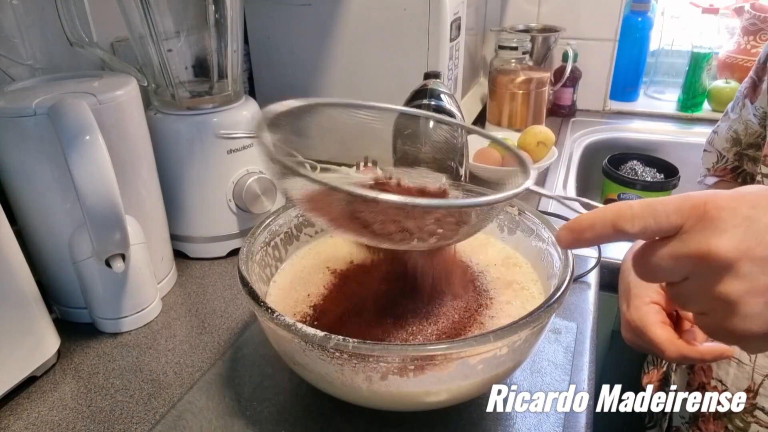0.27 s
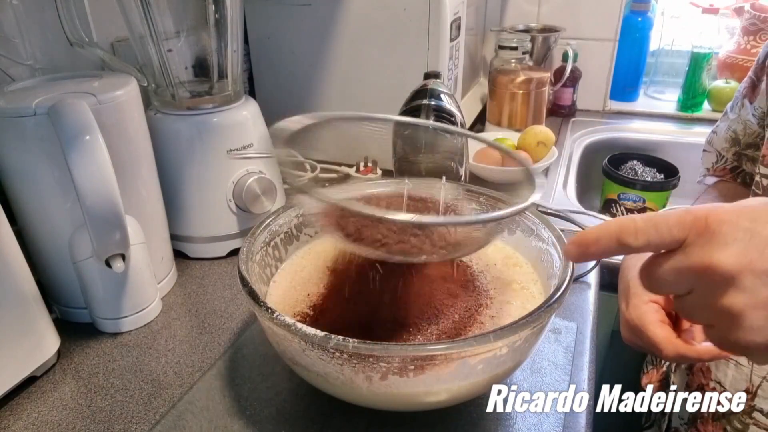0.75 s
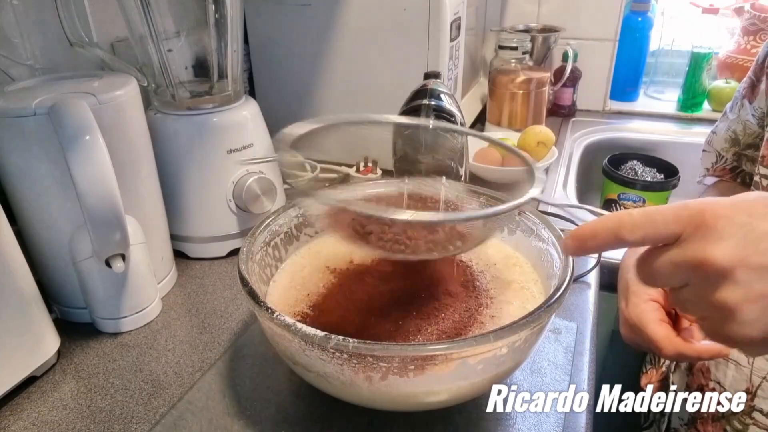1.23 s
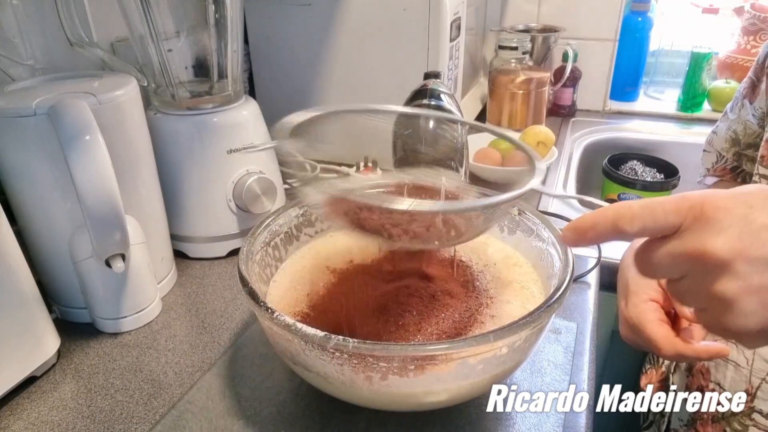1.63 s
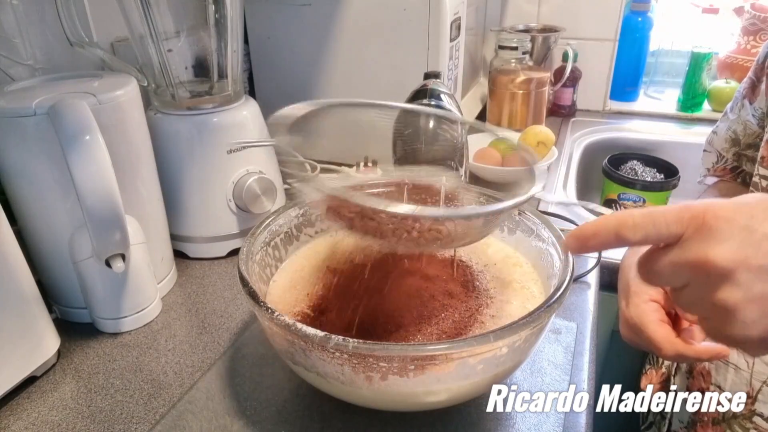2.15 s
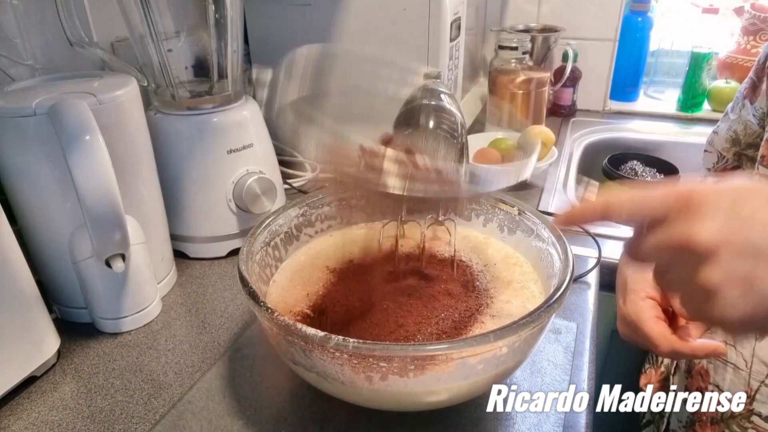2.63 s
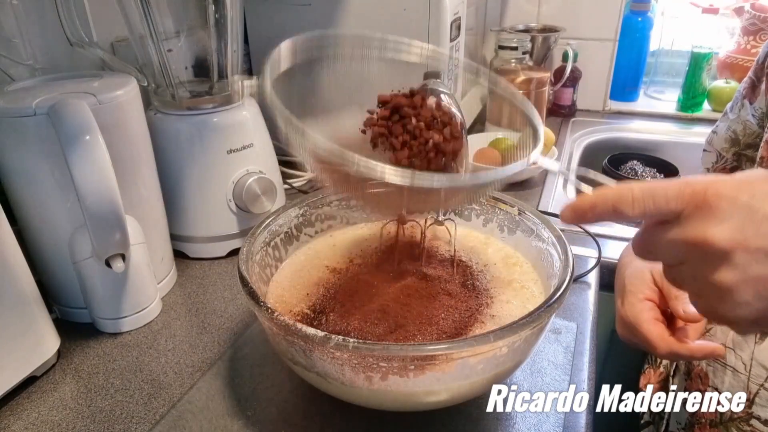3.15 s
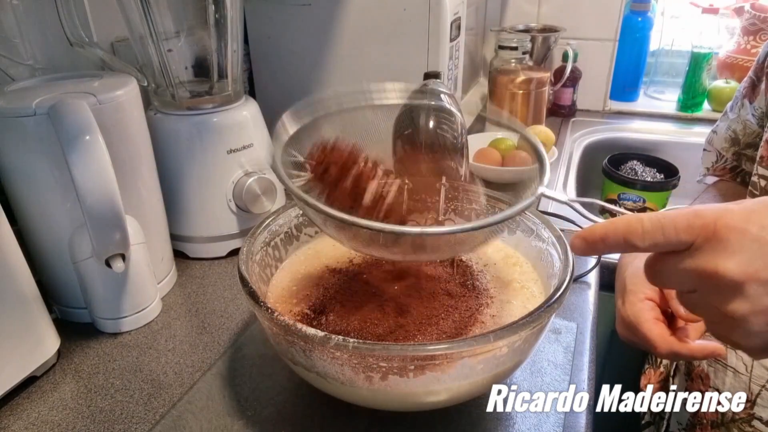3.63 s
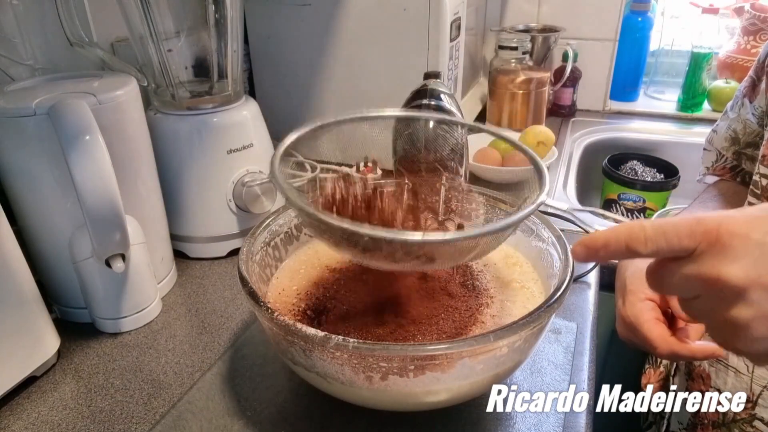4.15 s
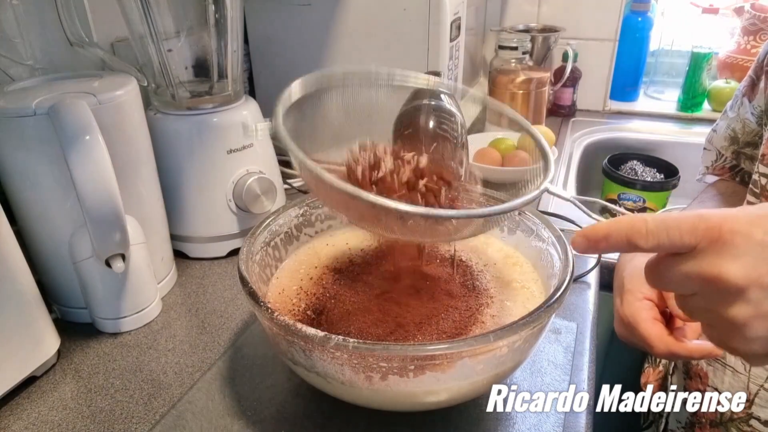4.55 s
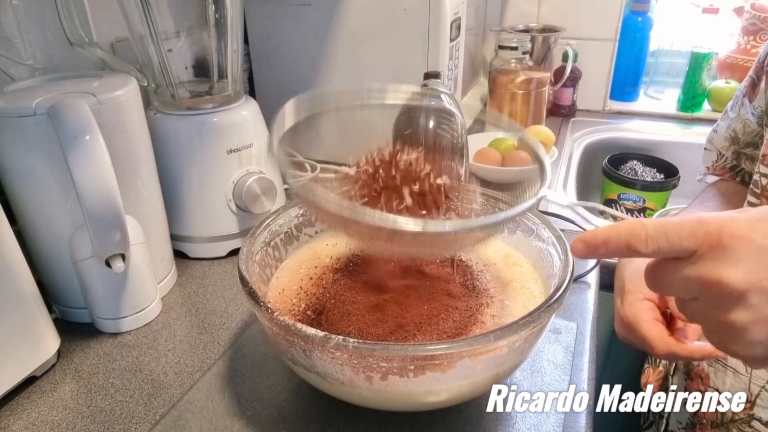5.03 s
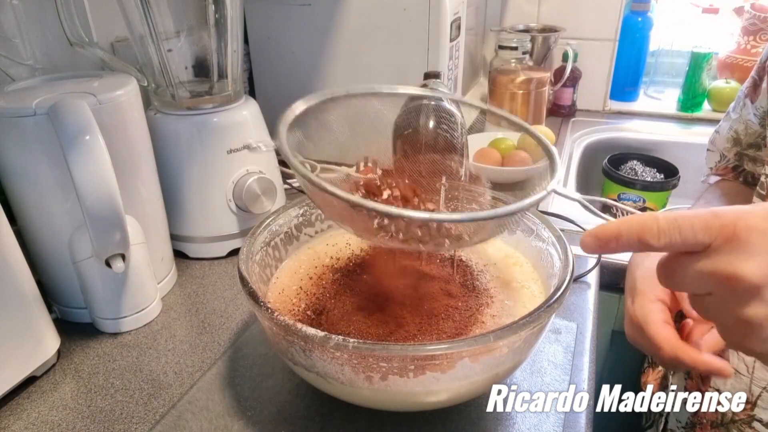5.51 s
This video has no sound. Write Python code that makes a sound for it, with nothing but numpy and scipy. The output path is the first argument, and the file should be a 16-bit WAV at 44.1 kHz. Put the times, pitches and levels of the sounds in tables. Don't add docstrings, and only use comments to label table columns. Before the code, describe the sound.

Close in a quiet, hard-walled kitchen, a wire sieve swishes rapidly back and forth while a finger knocks its rim about five times a second, each knock a small metallic ring with a spray of grains. After about two and a half seconds the shaking stops and lumps are tossed, pattering irregularly on the mesh with bright ticks. A low fridge hum runs throughout.

```python
import sys
import numpy as np
from scipy import signal
from scipy.fft import rfft, irfft, next_fast_len
from scipy.io import wavfile
from scipy.ndimage import uniform_filter1d, map_coordinates

SR = 44100
rng = np.random.default_rng(int(sys.argv[2]) if len(sys.argv) > 2 else 0)


def generate_wav(signal):
    frames = np.transpose(np.atleast_2d(signal))
    scaled = np.clip(frames, -1, 1) * 32767
    pcm = np.round(scaled).astype(np.int16)
    wavfile.write(sys.argv[1], SR, pcm)


def amplitude_ratio(level_db):
    exponent = np.asarray(level_db, float) / 20
    return 10 ** exponent


N = 254589

# centre_hz, width_hz, boost_db
MESH_MODES = [(2150, 54, 2), (2350, 56, 5.5), (2800, 105, 6), (3100, 140, 4.5), (5220, 150, 5),
              (5140, 290, -1.5), (6400, 180, -0.5), (7770, 390, 5)]
# centre_hz, width_hz, boost_db
ROOM_MODES = [(151, 12, 3), (160.6, 14, -5), (194.3, 25, 4.5), (276, 18, -0.5), (567, 22, -2.5),
              (638, 40, -3), (798, 43, 2.5), (920, 15, 6.5), (1009, 47, -5), (234, 19, 6), (346.5, 55, 6),
              (390.8, 21.5, 7), (493.6, 15.4, 9.5), (538, 40, 6.5), (630.5, 27, 9), (746, 23, 6),
              (856, 46, 6.5), (987, 34, 4.5), (1053, 51, 7), (1132, 21.5, 9.5), (1224, 43, 8),
              (1345, 20, 8)]
# freq_hz, likeness
SIEVE_LIKENESS = [(2000, 0.33), (3000, 0), (5000, 0), (7000, .1), (8300, .5), (15000, 0.95)]
# freq_hz, likeness
ROOM_LIKENESS = [(60, 0.88), (150, 0.87), (290, 0.86), (640, 0.46), (1400, 0.17), (3100, -0.084),
                 (5500, -0.19), (7000, 0.2), (7700, 0.86), (15000, 0.93)]


def unit(x):
    return x / np.sqrt(np.mean(x ** 2) + 1e-20)


def along(points, hz):
    f, v = np.transpose(points)
    return np.interp(np.log(hz + 1), np.log(f + 1), v)


def bumps(rows, hz):
    return sum(db / (1 + (2 * (hz - c) / w) ** 2) for c, w, db in rows)


def wobble(rate_hz):
    knots = rng.standard_normal(int(N * rate_hz / SR) + 4)
    return map_coordinates(knots, [np.arange(N) * rate_hz / SR])


def noise():
    return rng.standard_normal((2, N))


def stereo(pair, level_db, alike, lead=((1, 0),)):
    m = next_fast_len(pair.shape[1] + 4096)
    hz = np.fft.rfftfreq(m, 1 / SR)
    turn = np.arccos(np.clip(along(alike, hz), -1, 1)) / 2
    mid, side = rfft(pair, m) * amplitude_ratio(level_db(hz)) * [np.cos(turn), np.sin(turn)]
    half = np.exp(.5j * along(lead, hz))
    both = irfft([(mid + side) * half, (mid - side) / half], m)
    return unit(both[:, :pair.shape[1]])


def narrowed(pair):
    low = signal.butter(4, 7400, fs=SR, output="sos")
    side = signal.sosfiltfilt(low, pair[0] - pair[1]) / 2
    return pair.mean(0) + [side, -side]


def grains(level_db, per_second, spread_db, patchy_db, alike=SIEVE_LIKENESS):
    hit = rng.random(N) < per_second / SR
    luck = np.minimum(rng.exponential(size=N), 4)
    size = hit * amplitude_ratio(spread_db * luck)
    z = signal.stft(size * noise(), nperseg=256)[2]
    field = uniform_filter1d(rng.standard_normal(z.shape[1:]), size=5, axis=0)
    field = uniform_filter1d(field, size=9, axis=1)
    patched = signal.istft(z * amplitude_ratio(patchy_db * unit(field)), nperseg=256)[1]
    return stereo(patched[:, :N], level_db, alike)


def swells(rows, rise_shape, fall_shape):
    t, power = np.arange(N) / SR, np.zeros(N)
    for s, db, rise, fall in rows:
        near = slice(max(round((s - .15) * SR), 0), round((s + .25) * SR))
        u = t[near] - s
        fade = np.where(u < 0, abs(u / rise) ** rise_shape, abs(u / fall) ** fall_shape)
        power[near] += amplitude_ratio(2 * db) * np.exp(-fade)
    return np.sqrt(power)


def ring(modes, t, apart):
    hz, db, t60 = np.transpose(modes)[:, :, None, None]
    luck_db = rng.normal(0, 1.5, (len(modes), 2, 1))
    phase = apart * rng.standard_normal((len(modes), 2, 1))
    level = amplitude_ratio(db + luck_db - 60 * t / t60)
    return np.sum(level * np.sin(2 * np.pi * hz * (t - .002) + phase), 0)


def knocks():
    # start_s, peak_db, low_ring_db, middle_ring_db
    knock_rows = [(0.227, -49, -14, -15), (0.62, -44.5, -17, -25), (0.822, -47.5, -12.5, -21),
                  (1.018, -44, -16.5, -19), (1.218, -45, -12.5, -18), (1.427, -46.5, -16, -28),
                  (1.622, -46, -12.5, -23), (1.8138, -39.5, -17.5, -20), (2.0113, -40, -19.5, -7),
                  (2.2102, -40, -16, -11), (3.0269, -51.5, -28, -29), (3.48, -52, -17, -17),
                  (4.0108, -53, -26, -18), (5.4992, -53, -19, -11)]
    # freq_hz, level_db, t60_s
    low_modes = [(2835, -1, .08), (2930, -2, .035), (3035, -1, .09)]
    middle_modes = [(4840, -10, .06), (6015, -5, .07), (6150, 0, .11), (6330, -8, .06)]
    high_modes = [(7300, -6, .05), (7740, -5, .07), (7935, -1, .13), (8045, -1, .12), (8290, -2, .09),
                  (8915, -8, .07)]
    # freq_hz, density_db
    thrown_colour = [(1800, -30), (2600, -14), (3300, -13), (4200, -15), (5300, -9), (6200, -4), (7000, -5),
                     (8000, 0), (9000, -4), (11000, -10), (16000, -13)]
    # freq_hz, density_db
    spray_colour = [(7000, -45), (9000, -13), (10700, -10), (12000, 2), (13400, 2), (14000, -21),
                    (16000, -1.5)]
    # freq_hz, likeness
    spray_likeness = [(5000, 0.073), (7500, -.3), (12000, -0.36), (15500, -.1)]
    spray_db, spray_db_per_db, settle_t60_s = -13.5, .4, 0.16

    out, t = np.zeros((2, N + SR)), np.arange(SR // 4) / SR
    scatter = grains(lambda hz: along(thrown_colour, hz), 9000, 0.2, 1.5, spray_likeness)
    spray = grains(lambda hz: along(spray_colour, hz), 15000, 0.5, 3.0, spray_likeness)
    scatter, spray = [np.pad(x, ((0, 0), (0, SR))) for x in (scatter, spray)]
    settling, drizzle = amplitude_ratio(2.5) * narrowed(scatter), amplitude_ratio(3.0) * narrowed(spray)
    contact = 1 - np.exp(-(t / .0015) ** 2)
    damped = amplitude_ratio(-60 * t / 0.024) + amplitude_ratio(-8.5)
    settle_db = -60 * t / settle_t60_s
    mean_db = np.mean(knock_rows, 0)[1]
    for s, db, low_db, middle_db in knock_rows:
        start = round((s - .0006) * SR)
        at = slice(start, start + len(t))
        rim = amplitude_ratio(low_db + 2.0) * ring(low_modes, t, apart=0.92)
        rim += amplitude_ratio(middle_db - 1.5) * ring(middle_modes, t, apart=0.96)
        rim += amplitude_ratio(-15.5) * ring(high_modes, t, apart=1.8)
        thrown = amplitude_ratio(-12 - 60 * t / 0.033) * scatter[:, at] + amplitude_ratio(-14.5 + settle_db) * settling[:, at]
        sprayed = amplitude_ratio(1.0 - 60 * t / 0.04) * spray[:, at] + amplitude_ratio(-5.5 + settle_db) * drizzle[:, at]
        top_db = spray_db + spray_db_per_db * (db - mean_db)
        sprayed *= amplitude_ratio(top_db - 0.5) * (1 - np.exp(-t / 0.0014))
        out[:, at] += amplitude_ratio(db + 1.5) * contact * (rim * damped + thrown + sprayed)
    return out[:, :N]


def strokes():
    # time_s, stroke_rms_db
    effort = [(0, -71.5), (.45, -73.5), (.95, -70), (1.25, -72.5), (1.8, -69), (2.4, -69)]
    # peak_s, rms_db
    drifts = [
        (3.0, -76),
        (3.39, -73.5),
        (3.78, -70.5),
        (5.45, -79),
        (5.55, -73),
        (5.76, -77.5),
    ]
    away, toward = (0.37, 0.037, 0.025), (1.3, 0.03, 0.036)  # over_effort_db, rise_s, fall_s
    first_s, period_s, count = 0.068, .1006, 24

    rows = []
    for k in range(count):
        peak_s = first_s + period_s * k
        over_db, rise_s, fall_s = (away, toward)[k % 2]
        effort_db = np.interp(peak_s, *np.transpose(effort))
        rows.append((peak_s, effort_db + over_db, rise_s, fall_s))
    return rows + [(peak_s, db, .028, 0.037) for peak_s, db in drifts]


def slide():
    # freq_hz, density_db
    fine_colour = [(1180, -57), (2000, -6), (2420, -10), (2640, -4), (3410, -8), (4780, -6), (6190, -1.5),
                   (6860, -1.5), (7540, 1), (8300, -4), (11100, -11.5), (14900, -11), (15700, -13)]
    # time_s, share_db
    coarse_share = [(0, -3), (.6, -3), (1.5, -10.5), (2.4, -14), (3.8, -7), (5.77, -15)]
    coarse_colour = [(1500, -25), (2200, -3), (3000, -0.5), (3900, -2.5), (5000, -14), (6500, -32)]

    fine = grains(lambda hz: along(fine_colour, hz) + 0.3 * bumps(MESH_MODES, hz), 12000, -2.0, 2.5)
    rough = grains(lambda hz: along(coarse_colour, hz), 8000, 1.5, 2)
    share_db = np.interp(np.arange(N) / SR, *np.transpose(coarse_share))
    motion = swells(strokes(), rise_shape=1.8, fall_shape=2.3) * amplitude_ratio(1.3 * wobble(60))
    return motion * (fine + amplitude_ratio(share_db) * rough)


def landings():
    # peak_s, rms_db, ring_db, weight_db
    landing_rows = [(2.645, -55, 4.5, 8), (2.85, -69.5, 2, -4), (3.148, -61.5, 4, 1),
                    (3.613, -58.5, -5, -3), (3.951, -61, 2, 2), (4.126, -58, -1, 0), (4.277, -63.5, 5.5, 0),
                    (4.451, -60.5, 9, -8), (4.627, -66, 8, 0), (4.787, -66, 7, -6), (4.951, -61.5, 4, -6),
                    (5.131, -57.5, 7.5, -8), (5.281, -64.5, -12, -1)]
    # freq_hz, density_db
    lump_colour = [(1100, -21), (1800, -13), (2400, -10), (3200, -7.5), (4200, -4.5), (5100, -3.5),
                   (6260, -0.5), (7680, -2), (9130, -8.5), (11000, -14.5), (15700, -16.5)]
    deep_colour = [(500, -30), (900, -3), (1450, 0), (1850, -5), (2300, -4), (2800, -14), (3600, -34)]
    rim_colour = [(1700, -30), (2300, -12.0), (2750, -4.0), (3050, -5), (3500, -3), (4300, -20),
                  (5100, -5.5), (5700, -8), (7000, -29)]

    s, db, ring_db, weight_db = np.transpose(landing_rows)
    loose = np.exp(0.04 * (db.max() - db))
    rise_s, fall_s = .011 * loose, .015 * loose

    def rows(over_db):
        return np.transpose([s, db + over_db, rise_s, fall_s])

    lumps = grains(lambda hz: along(lump_colour, hz) + bumps(MESH_MODES, hz), 7000, 1.5, 2.5)
    clang = grains(lambda hz: along(rim_colour, hz) + 0.4 * bumps(MESH_MODES, hz), 4000, 0.5, 2.5)
    thud = grains(lambda hz: along(deep_colour, hz) + 1.1 * bumps(MESH_MODES, hz), 4000, 1.5, 5.0)
    clumps = amplitude_ratio(1.5 * wobble(150))
    patter = swells(rows(0), rise_shape=2.75, fall_shape=1.22) * clumps * lumps
    patter += swells(rows(ring_db - 11.5), rise_shape=3.0, fall_shape=1.6) * clang
    return patter + swells(rows(weight_db - 10.5), rise_shape=2.1, fall_shape=1.8) * thud


def ticks():
    # start_s, peak_db, bright_edge_db
    tick_rows = [(1.8614, -57, -17), (2.0564, -56, -20), (2.5271, -61, -8), (2.585, -55, -16),
                 (3.3433, -61, -22), (3.5228, -58, -22), (3.5432, -54, -23), (3.678, -56.5, -9),
                 (3.7299, -59, -23), (3.8471, -58.5, -16), (3.896, -56.5, -23), (4.0662, -54.5, -22),
                 (4.1844, -59, -12), (4.226, -55.5, -17), (4.3374, -57.5, -17), (4.5689, -62, -21),
                 (4.6882, -65, -16), (4.7292, -61, -17), (4.8294, -61, -17), (4.8416, -56, -8),
                 (5.0049, -53, -8), (5.0588, -56, -17), (5.2199, -67, -16), (5.6809, -60, -11),
                 (5.7289, -61.5, -22)]
    # freq_hz, density_db
    wire_colour = [(2500, -24), (4500, -7), (6500, 4), (8500, -3), (10000, -16), (16000, -28)]
    edge_colour = [(6000, -36), (10000, -18), (16000, -12)]

    t = np.arange(SR // 16) / SR
    shape = (amplitude_ratio(-60 * t / 0.04) + amplitude_ratio(-4.5 - 60 * t / 0.14)) * (1 - np.exp(-t / .0006))
    body, top = np.zeros((2, N + SR))
    for s, db, edge_db in tick_rows:
        at = slice(round(s * SR), round(s * SR) + len(t))
        body[at] += amplitude_ratio(db - 13) * shape
        top[at] += amplitude_ratio(db + edge_db - 2) * shape
    wires = stereo(noise(), lambda hz: along(wire_colour, hz), SIEVE_LIKENESS)
    edge = stereo(noise(), lambda hz: along(edge_colour, hz), SIEVE_LIKENESS)
    return body[:N] * wires + top[:N] * edge


def kitchen(x):
    # freq_hz, t60_s
    decay = [(2000, 1), (7000, 0.52), (15000, 0.064)]
    hz, t, z = signal.stft(rng.standard_normal((2, SR // 2)), SR, nperseg=256)
    tail = signal.istft(z * amplitude_ratio(-60 * t / along(decay, hz)[:, None]), SR, nperseg=256)[1]
    tail = tail / np.linalg.norm(tail[0])
    delayed = np.pad(x, ((0, 0), (200, 0)))
    return signal.fftconvolve(delayed, tail, axes=1)[:, :N]


def fridge():
    # rms_db, wobble_percent
    hum_rows = [(-43, 6), (-68.5, 10), (-69.5, -19)]
    # freq_hz, density_db
    rumble_colour = [(15, -2.5), (32, -3.5), (48, -2.5), (80, -1.5), (130, 0), (170, -5.5), (250, -12),
                     (420, -16.5), (560, -15.5), (900, -14), (1250, -19), (1500, -25), (2200, -44.5),
                     (4000, -56)]
    # freq_hz, left_lead_rad
    left_lead = [(600, 0), (800, -0.08), (1400, -3), (2200, -4)]

    turn = 2 * np.pi * 100.09 * np.arange(N) / SR
    hum = np.zeros(N)
    for multiple, (db, percent) in enumerate(hum_rows, 1):
        level = np.sqrt(2) * amplitude_ratio(db) * (1 + percent / 100 * wobble(2.67))
        hum += level * np.sin(multiple * turn)
    rumble = stereo(noise(), lambda hz: along(rumble_colour, hz) + bumps(ROOM_MODES, hz),
                    ROOM_LIKENESS, left_lead)
    return hum + amplitude_ratio(-54.0) * rumble * amplitude_ratio([[-.5], [.5]])


def outdoors():
    # time_s, level_db
    drone_level = [(0, -59.5), (.68, -58.5), (.78, -53), (.9, -63.5), (1.8, -57.5), (2.7, -61.5), (4, -68),
                   (5.77, -67)]
    colour = [(120, -34), (200, 3), (330, 1), (480, -4.5), (800, -32.5)]  # freq_hz, density_db
    drone = stereo(noise(), lambda hz: along(colour, hz) + bumps(ROOM_MODES, hz), ROOM_LIKENESS)
    level_db = np.interp(np.arange(N) / SR, *np.transpose(drone_level))
    return amplitude_ratio(level_db - 5.5 + 1.8 * wobble(3.7)) * drone


def air():
    # freq_hz, density_db
    hiss_colour = [(900, -44), (1500, -1.5), (1900, -8.5), (2900, -12.5), (4050, -12.5), (5000, -15),
                   (7400, -15), (8200, -19.5), (9100, -24.5), (10400, -27), (12000, -21.5), (13500, -19.5),
                   (15700, -25.5)]
    return amplitude_ratio(-72.5) * stereo(noise(), lambda hz: along(hiss_colour, hz), ROOM_LIKENESS)


def scene():
    left = amplitude_ratio([[1.3], [-1.3]])
    blows = knocks() * left
    powder = (slide() + landings() + ticks()) * left
    echo = amplitude_ratio(-20.5) * kitchen(blows + powder)
    return blows + narrowed(powder + echo) + fridge() + outdoors() + air()


def band_limit(x):
    return signal.sosfilt(signal.butter(12, 16450, fs=SR, output="sos"), x)


def record(dry):
    m = next_fast_len(N)
    kept = np.fft.rfftfreq(m, 1 / SR) < 15830
    limited = irfft(rfft(dry, m) * kept, m)[:, :N]
    return band_limit(limited)


dry = scene()
out = record(dry)
generate_wav(out)
```